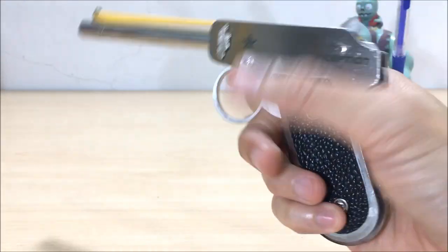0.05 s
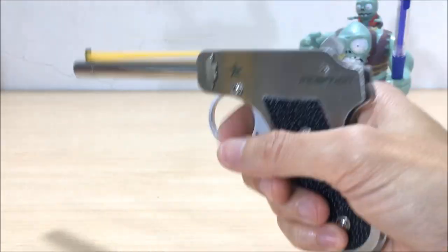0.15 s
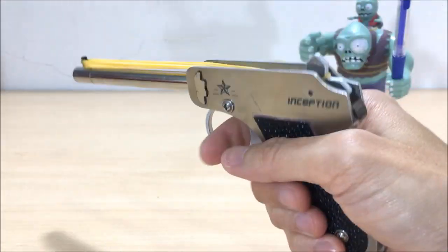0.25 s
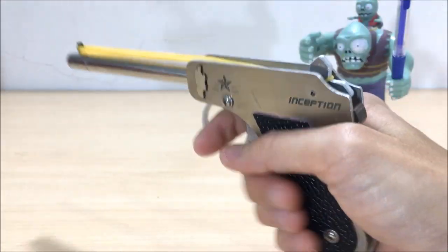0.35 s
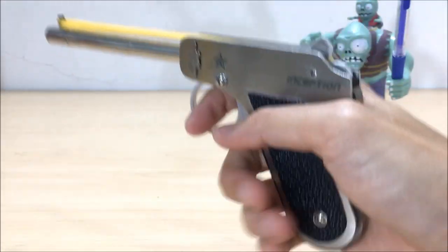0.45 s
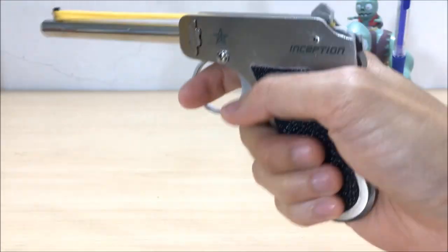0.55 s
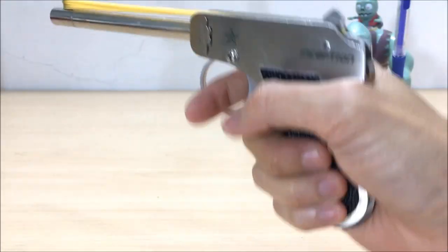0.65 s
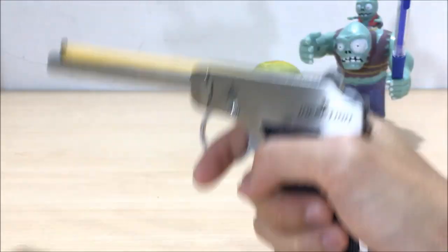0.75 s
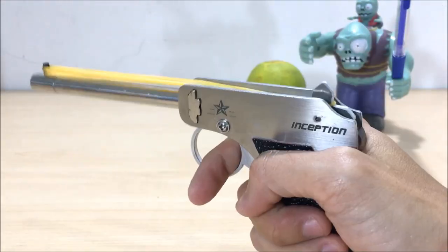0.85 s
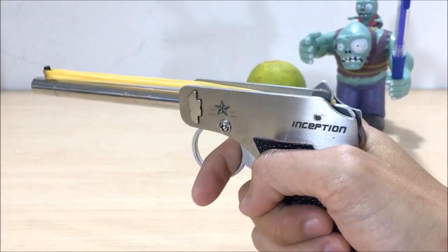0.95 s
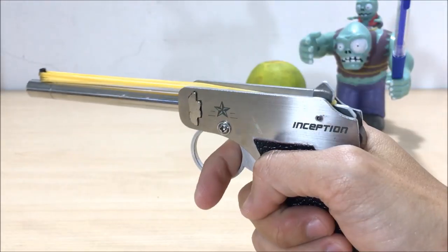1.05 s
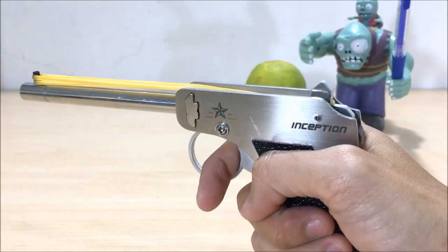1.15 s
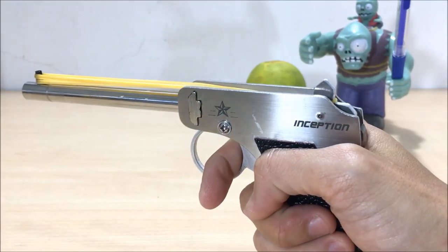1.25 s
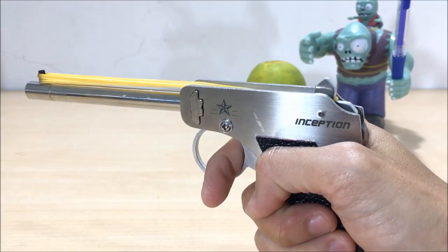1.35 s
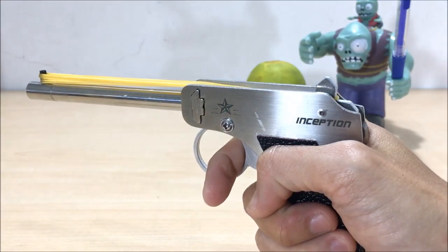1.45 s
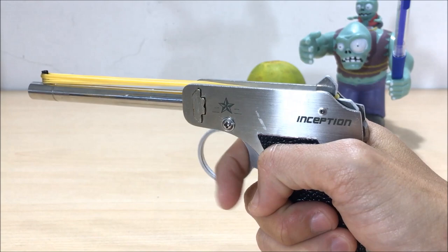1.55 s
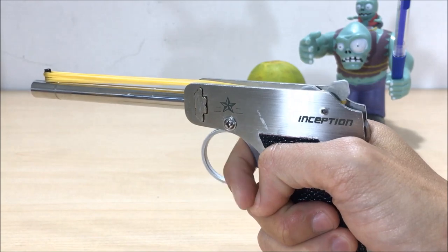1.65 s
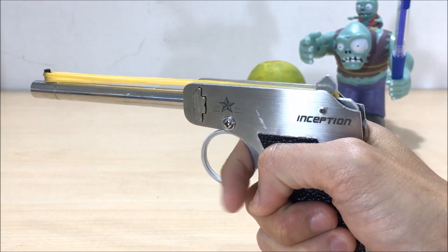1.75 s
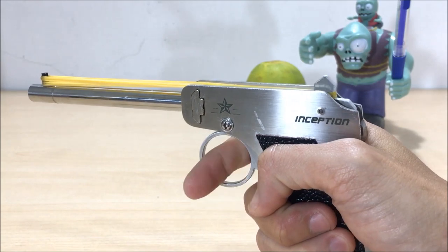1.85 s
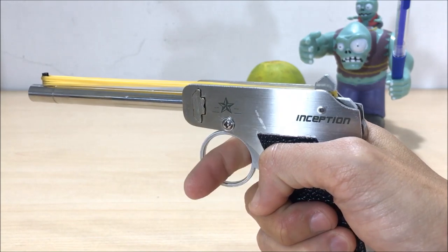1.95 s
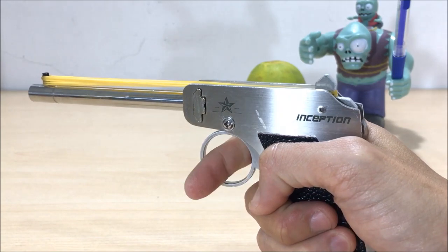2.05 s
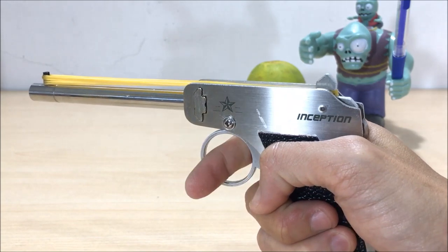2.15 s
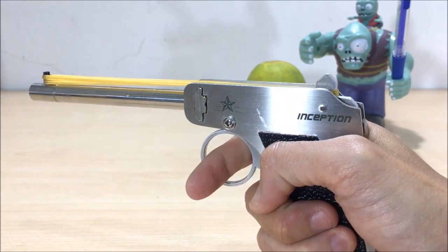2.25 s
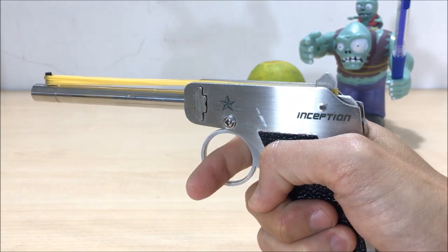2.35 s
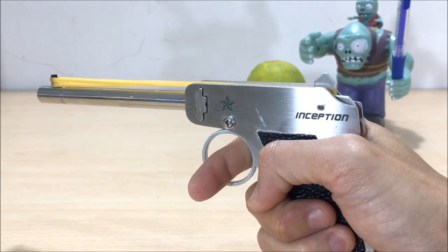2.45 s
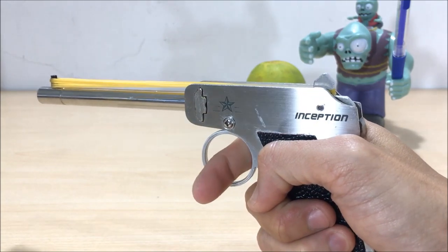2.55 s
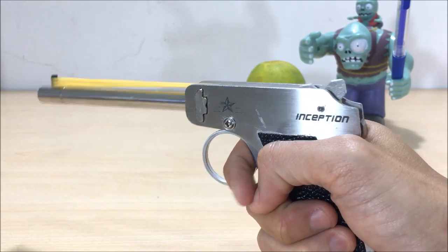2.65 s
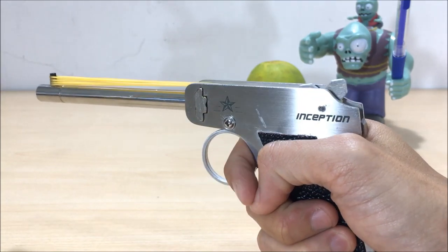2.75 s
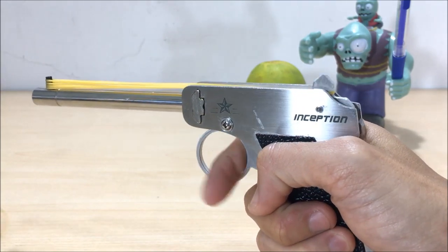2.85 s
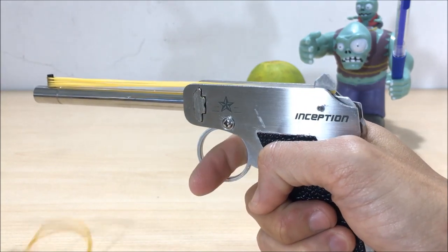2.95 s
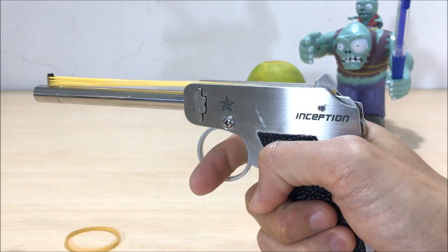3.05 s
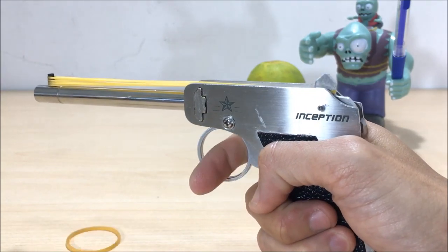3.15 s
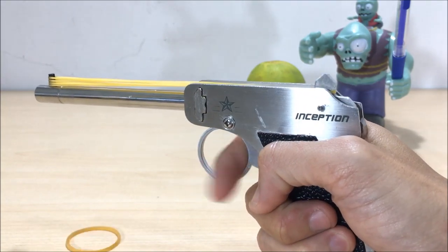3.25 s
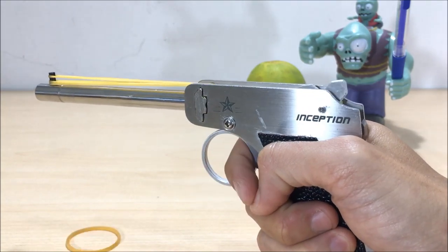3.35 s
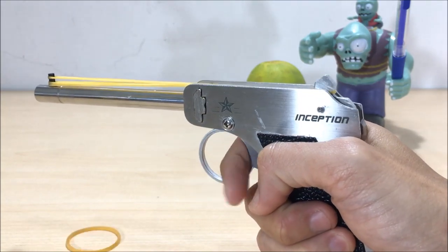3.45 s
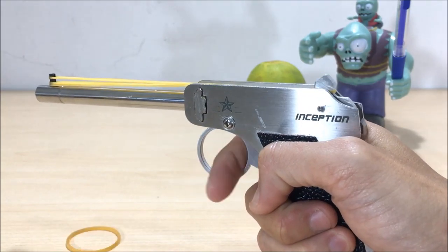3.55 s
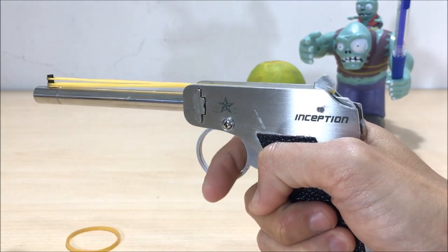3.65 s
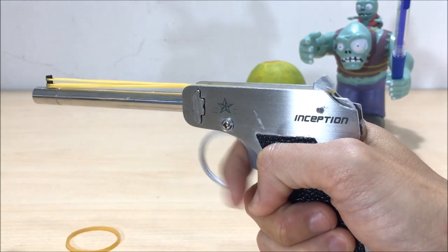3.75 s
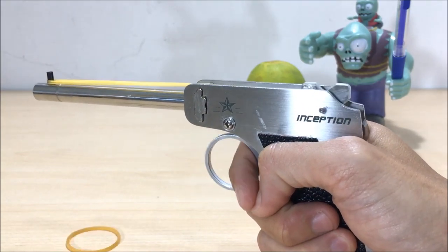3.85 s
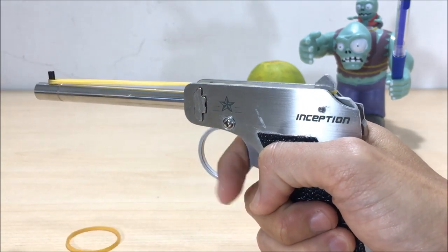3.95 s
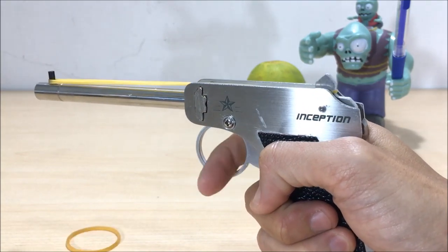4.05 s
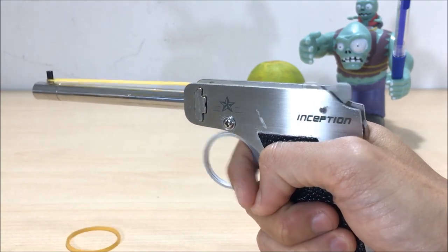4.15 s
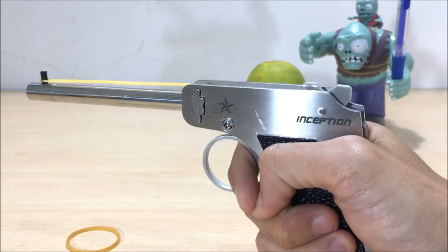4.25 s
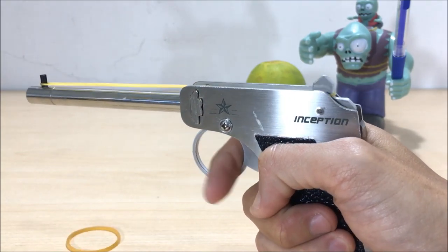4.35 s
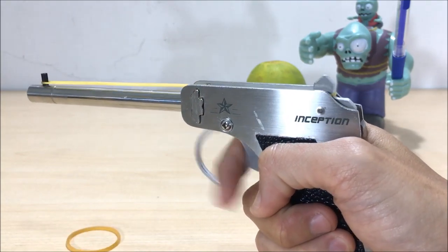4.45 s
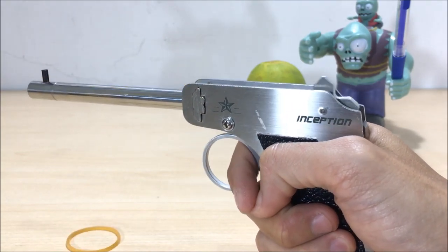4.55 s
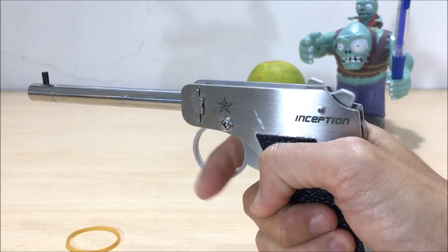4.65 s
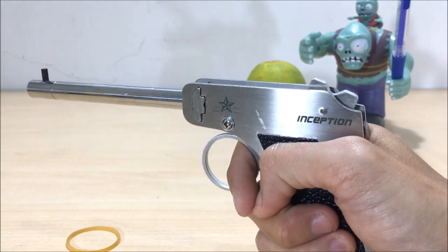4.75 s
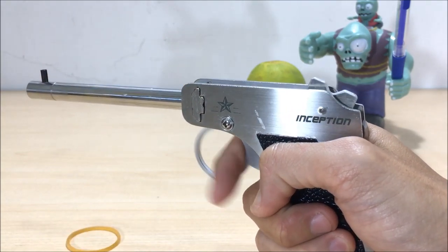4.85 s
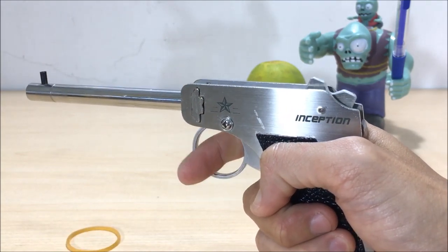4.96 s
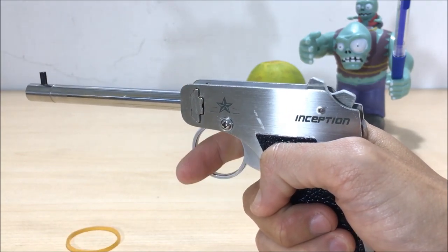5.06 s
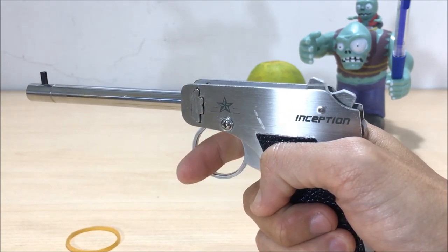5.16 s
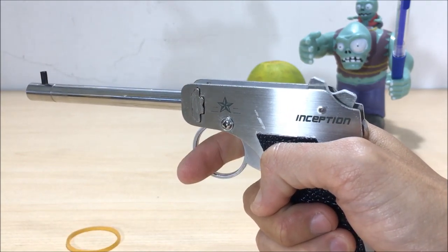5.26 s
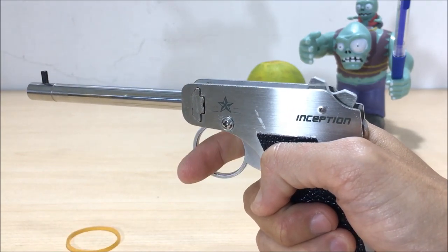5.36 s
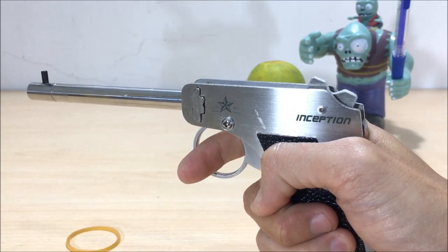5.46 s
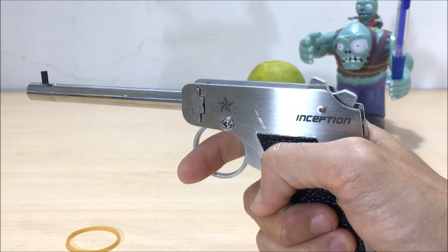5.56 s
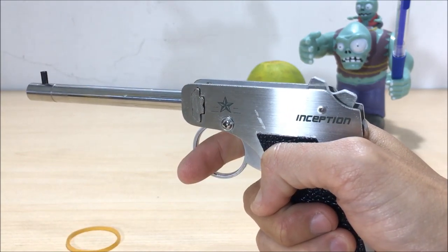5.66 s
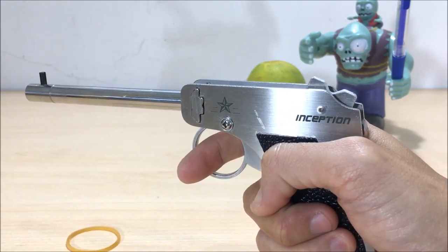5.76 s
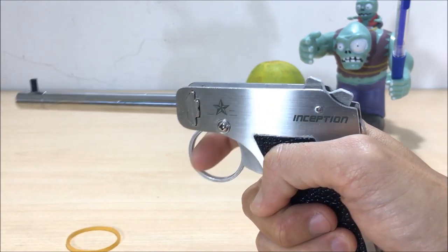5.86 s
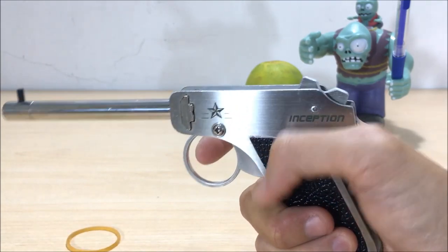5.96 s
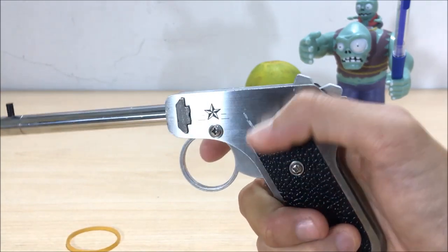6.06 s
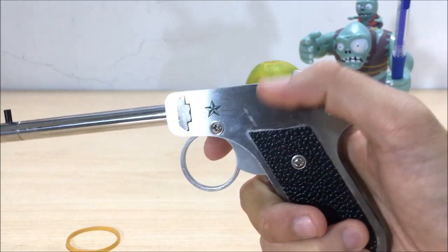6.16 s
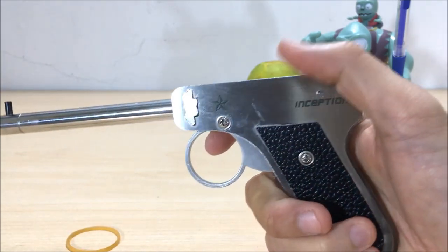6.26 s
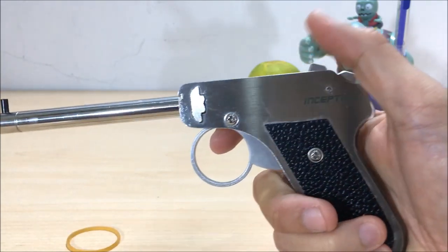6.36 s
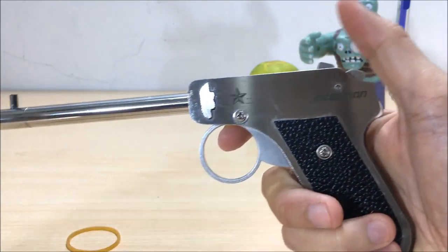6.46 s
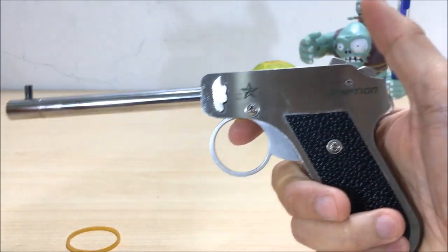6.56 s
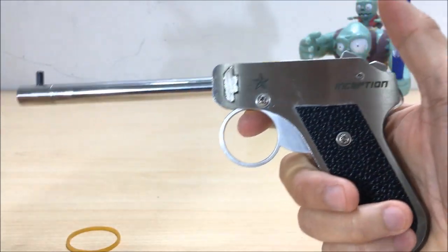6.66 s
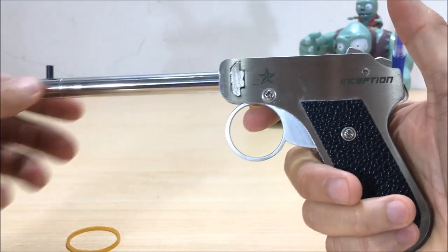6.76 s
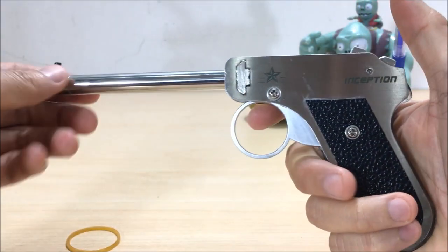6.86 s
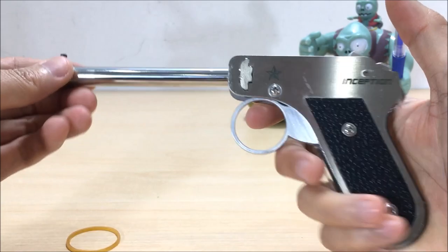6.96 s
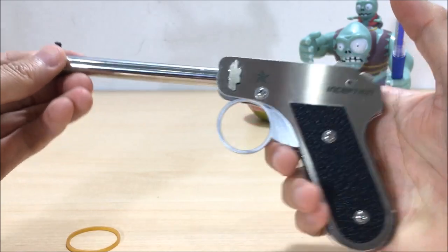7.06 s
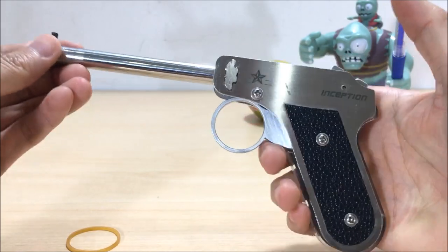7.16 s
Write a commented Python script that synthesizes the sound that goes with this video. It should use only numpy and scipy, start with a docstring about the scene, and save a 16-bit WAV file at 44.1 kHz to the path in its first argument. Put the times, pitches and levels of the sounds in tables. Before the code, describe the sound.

A steel rubber band pistol fires in quick succession, with sharp metal clicks and bands smacking into things.

```python
"""A steel rubber band pistol, close to a microphone over a table in a small room.
Low rumble and a faint twitter run throughout; a hand rubs the frame. A trigger pull trips the release
wheel, the let-go resets the pawl: hard steel clicks that overload the microphone. Five more pulls each
fire a band that smacks into something; the first band rings a hollow thing and shoves air at the mic.
Between shots bands graze, stretch and drop. Last: a light reset, ticks, rubs, a knock on the barrel."""
import sys
import numpy as np
from scipy import signal
from scipy.fft import rfft, irfft
from scipy.io import wavfile

SR = 44100
rng = np.random.default_rng(int(sys.argv[2]) if len(sys.argv) > 2 else 0)


def unload_wav(signal):
    """Save mono or channel-first audio to the path in sys.argv[1] as 16-bit WAV at rate SR, clipped to [-1, 1]."""
    wavfile.write(
        sys.argv[1],
        SR,
        np.round(np.clip(np.atleast_2d(signal).T, -1, 1) * 32767).astype(np.int16),
    )


N = 317520

# room rumble and hiss (frequency [Hz], relative density [dB])
RUMBLE_SPECTRUM = [(10, 2), (27, -2), (40, 0.5), (58, -6.5), (75, -15), (200, -20), (260, -23.5),
                   (380, -22.5), (870, -29.5), (1700, -39), (2700, -44.5), (3300, -43.5), (3800, -45.5),
                   (4600, -43.5), (5300, -49.5), (5800, -47.5), (11000, -63), (16000, -63)]
# steady whines (frequency [Hz], level [dB])
WHINES = [(2040, -80), (3290, -83)]
# twitter notes (pitch [Hz], nominal level [dB])
CHIRPS = [(4100, -78), (4530, -73), (4750, -79), (5850, -83), (6850, -83.5), (8200, -90)]
# soft rubs: hand on frame, band grazing and stretching (time [s], length [s], level [dB], centre [Hz])
RUBS = [(0.242, .13, -70.5, 7960), (0.431, .17, -69, 6370), (0.282, 1, -75, 6000), (0.63, 0.12, -59, 1060),
        (3.151, 0.067, -52, 2960), (3.16, .26, -56.5, 7280), (5.126, 0.077, -60.5, 3260),
        (6.25, .58, -78, 7500), (6.622, 0.18, -64, 1203)]
# wheel jumps one tooth (time [s], force [dB])
PULLS = [(1.671, 6.5), (2.7294, 2.5), (3.3774, 6.5), (3.8565, 5), (4.2353, 5), (4.5646, 1.5)]
# steel-on-steel contact (frequency [Hz], relative gain [dB])
CLACK_SPECTRUM = [(100, -9.5), (1200, -15), (2200, -9), (3500, -5), (5500, -2), (7600, -0.5), (8800, -4),
                  (10000, -4), (11200, -14), (13000, -17), (16000, -21.5)]
# frame and wheel modes (frequency [Hz], relative level [dB], t60 [s])
STEEL_MODES = [(2370, -36, .03), (3530, -22.5, 0.058), (4850, -24.5, .04), (5400, -20, 0.019),
               (5770, -20.5, 0.04), (6230, -18, .03), (7100, -17, 0.023), (7340, -19, 0.026),
               (7730, -18.5, 0.03), (9618, -10.5, 0.016)]
# table and wall reflections (delay [s], gain [dB])
ECHOES = [(.0028, -12.5), (.0066, -23.5), (0.0171, -25.5)]
# room decay (frequency [Hz], t60 [s])
ROOM_T60 = [(150, 0.16), (500, 0.31), (1100, 0.36), (2500, .37), (5300, .39), (9000, 0.36), (14000, 0.21)]
# room tail (frequency [Hz], relative gain [dB])
ROOM_SPECTRUM = [(60, -10), (300, 3), (1500, -4.5), (5000, 0.5), (8000, -3.5), (11000, -2.5), (16000, -1.5)]
# pawl drops back (time [s], force [dB])
RESETS = [(1.8171, 1.5), (2.8882, 2), (3.5289, 0.5), (4.0199, -1), (4.4057, -3)]
# band smacks a thing, or twangs low as it leaves
# (time [s], slap [dB], boom [Hz], boom lift [dB], boom width [Hz])
BAND_SNAPS = [(2.7404, 10.5, 789.5, 14.5, 104.8), (3.4151, -12.5, 327, 10.5, 136),
              (3.8985, -14.5, 1130, 6, 199), (4.2788, -7, 377.6, 2.5, 201.2),
              (4.562, -18.5, 513, 18.5, 167), (4.6174, -19.5, 490, 4.5, 296)]
# rubber slap (frequency [Hz], relative gain [dB])
SLAP_SPECTRUM = [(40, -15.5), (120, -1.5), (330, -1.5), (700, 2), (1000, -3), (1350, 0.5), (1900, -5),
                 (4000, -8.5), (9000, -2), (12000, -7), (16000, -4.5)]
# modes of the hollow thing (frequency [Hz], relative level [dB])
HOLLOW_MODES = [(629.8, -36), (694.4, -30.5), (753.7, -29.5), (769.8, -32.5), (855.9, -29.5),
                (969.0, -40.5), (1071, -40.5), (1136, -40), (1222, -39), (1324, -39.5)]
# spent bands land (time [s], slap [dB], ring lift [dB], bass [dB], room [dB])
DROPS = [(3.249, -23, 9.5, 8, -5), (3.653, -20.5, 17.5, 12, 2.5), (3.727, -25.5, 5.5, 11.5, 3)]
# last pawl reset, small steel ticks, hand knocking the barrel
# (time [s], force [dB], tilt [dB/octave], spot resonance [Hz], spot lift [dB])
LIGHT_CLICKS = [(4.8081, -24, -13.5, 5620, 8.5), (4.9578, -34, -5, 2066, 18), (5.925, -57, -3.5, 7600, 9),
                (6.1463, -58, 0, 8106, 1), (7.0123, -53, 2, 6450, 9), (7.0549, -19.5, 3, 1450, 20.5)]


def gain_of(db):
    """Decibels to amplitude."""
    return 10 ** (np.asarray(db) / 20)


def unit_rms(x):
    """Scales to rms 1."""
    return x / np.sqrt(np.mean(x ** 2) + 1e-20)


def lookup(table, hz):
    """Interpolates on a log-frequency axis."""
    table_hz, values = np.transpose(table)
    return np.interp(np.log(hz + 1), np.log(table_hz), values)


def add(mix, time_s, sound):
    """Mixes a sound in at time_s."""
    part = mix[max(round(time_s * SR), 0):][:len(sound)]
    part += sound[:len(part)]


def colour(x, shape_db, size=4096):
    """Minimum-phase filter of unit energy, shaped by shape_db(hz)."""
    log_gain = np.log(gain_of(shape_db(abs(np.fft.fftfreq(size, 1 / SR)))) + 1e-5)
    taps = np.fft.ifft(np.exp(np.conj(signal.hilbert(log_gain)))).real[:size // 2]
    return signal.fftconvolve(x, taps / np.linalg.norm(taps))[:len(x)]


def decay(t, t60_s):
    """Falls 60 dB in t60_s."""
    return np.exp(-np.log(1000) * t / t60_s)


def resonance_db(hz, centre_hz, lift_db, width_hz):
    """One peak on a flat response."""
    offset = (hz ** 2 - centre_hz ** 2) / (width_hz * hz + 1)
    return 10 * np.log10(1 + (gain_of(lift_db) ** 2 - 1) / (1 + offset ** 2 / 2) ** 2)


def room_tone(rumble_db=-43):
    """Steady rumble, faint hiss, thin whines."""
    t = np.arange(N) / SR
    spectrum = gain_of(lookup(RUMBLE_SPECTRUM, np.fft.rfftfreq(N, 1 / SR)))
    rumble = unit_rms(irfft(rfft(rng.standard_normal(N)) * spectrum, N))
    whines = sum(gain_of(db) * np.sin(2 * np.pi * hz * t) for hz, db in WHINES)
    return gain_of(rumble_db) * rumble + whines


def twitter(pitch_hz, level_db, count=32, blur_hz=110, spread=.033):
    """A thin, fuzzy note recurs, random in time, level and pitch."""
    out = np.zeros(N)
    swell = signal.windows.hann(SR // 8)
    t = np.arange(len(swell)) / SR
    for slot, (late, size, detune) in enumerate(rng.random((count, 3))):
        blur = rng.standard_normal(len(t) // 32)
        wobble = np.interp(t * 2 * blur_hz, np.arange(len(blur)), blur)
        note_hz = pitch_hz * (1 + spread * (2 * detune - 1))
        note = 2 * wobble * np.sin(2 * np.pi * note_hz * t)
        add(out, (slot + late) * N / SR / count, gain_of(level_db) * (.5 + size) * swell * note)
    return 0, out


def rub(time_s, length_s, level_db, centre_hz, grain_db=4, rolloff_db=14):
    """Soft, grainy friction: a hand on the frame, or a band grazing and stretching."""
    count = int(length_s * SR)
    grains = rng.standard_normal(count) * gain_of(grain_db * rng.standard_normal(count))
    hiss = colour(grains, lambda hz: -rolloff_db * np.log2((hz + 1) / centre_hz) ** 2)
    return time_s, gain_of(level_db) * unit_rms(hiss) * signal.windows.hann(count)


def chatter(t, t60_s, evenness, first_hit=2.9):
    """One contact, then a dying burst of smaller ones; evenness (0-1) flattens spectral ripple."""
    contacts = np.where(t == 0, first_hit, np.sign(rng.standard_normal(len(t))) * decay(t, t60_s))
    power = abs(rfft(contacts)) ** 2
    ripple_db = 10 * np.log10(power / power.mean() + .03)
    bins_hz = np.fft.rfftfreq(len(t), 1 / SR)
    flattened = colour(contacts, lambda hz: -evenness * np.interp(hz, bins_hz, ripple_db))
    return flattened * np.linalg.norm(contacts) / np.linalg.norm(flattened)


def room_tail(x, room_db, build_s=.008):
    """Diffuse sound builds up, then dies band by band."""
    hz, t, bands = signal.stft(rng.standard_normal(SR * 2 // 3), SR, nperseg=256)
    bands *= decay(t, lookup(ROOM_T60, hz)[:, None]) * gain_of(lookup(ROOM_SPECTRUM, hz))[:, None]
    tail = signal.istft(bands, SR, nperseg=256)[1]
    tail *= 1 - np.exp(-(np.arange(len(tail)) / SR / build_s) ** 2)
    return gain_of(room_db) * signal.fftconvolve(x, tail / np.linalg.norm(tail))


def click(time_s, force_db, t60_s, edge_hz, tilt_db_oct, scrape_db, spot_hz, spot_db,
          room_db=-13, scrape_s=.0058, shelf_db=-8, detune=.011):
    """A short scrape, then a chattering blow rings the steel frame."""
    def accent_db(hz):
        octaves = np.log2(np.maximum(hz, edge_hz) / edge_hz)
        return tilt_db_oct * octaves + shelf_db / (1 + (hz / edge_hz) ** 10)

    def shape_db(hz):
        # lighter blow: longer contact, less top
        dull_db = np.clip(.45 * force_db, -9, 0) / (1 + (11500 / (hz + 1)) ** 12)
        peak_db = resonance_db(hz, spot_hz, spot_db, width_hz=.14 * spot_hz)
        return lookup(CLACK_SPECTRUM, hz) + accent_db(hz) + dull_db + peak_db

    t = np.arange(SR // 10) / SR
    blow = colour(chatter(t, t60_s, evenness=.1), shape_db)
    for hz, db, ring_t60_s in STEEL_MODES:
        drift, phase = rng.uniform(-1, 1, 2)
        mode = np.sin(2 * np.pi * hz * (1 + detune * drift) * t + np.pi * phase)
        blow += gain_of(db + accent_db(hz)) * decay(t, ring_t60_s) * mode
    scrape = colour(rng.standard_normal(len(t)) * (t < scrape_s) * t / scrape_s, shape_db)
    out = np.zeros(SR)
    add(out, 0, gain_of(scrape_db) * scrape)
    add(out, scrape_s, blow)
    for delay_s, db in ECHOES:
        add(out, scrape_s + delay_s, gain_of(db) * blow)
    # the room sums all directions, partly averaging out the blow's ripple
    smooth_blow = np.linalg.norm(blow) * colour(1. * (t == 0), shape_db)
    add(out, scrape_s, room_tail(.68 * smooth_blow + .65 * blow, room_db))
    return time_s - scrape_s, gain_of(force_db) * out


def pawl_t60_s(force_db, base_s=.02, halving_db=8.5):
    """A harder blow seats the pawl sooner."""
    return base_s * 2 ** (-force_db / halving_db)


def pull(time_s, force_db):
    """The wheel scrapes off the pawl and slams into the next stop: a full, bright clack."""
    return click(time_s, force_db, pawl_t60_s(force_db), edge_hz=3300, tilt_db_oct=.45,
                 scrape_db=-18.5 - force_db, spot_hz=3330, spot_db=3.5)


def reset(time_s, force_db):
    """The pawl springs back with little scrape: a narrower clack."""
    return click(time_s, force_db, pawl_t60_s(force_db), edge_hz=3500, tilt_db_oct=0,
                 scrape_db=-24 - force_db, spot_hz=5296, spot_db=3)


def smack(time_s, slap_db, boom_hz, boom_db, width_hz, bass_db, room_db, top_hz, t60_s, first_hit,
          bass_hz=350):
    """A rubber slap with one damped boom."""
    def rubber_db(hz):
        return lookup(SLAP_SPECTRUM, hz) - 10 * np.log10(1 + (hz / top_hz) ** 5)

    def body_db(hz):
        return resonance_db(hz, boom_hz, boom_db, width_hz) + bass_db / (1 + (hz / bass_hz) ** 4)

    t = np.arange(SR // 4) / SR
    contacts = chatter(t, t60_s, evenness=.62, first_hit=first_hit)
    hit = colour(colour(contacts, rubber_db), body_db)
    out = room_tail(hit, room_db)
    add(out, 0, hit)
    return time_s, gain_of(slap_db) * out


def band_snap(time_s, slap_db, boom_hz, boom_db, width_hz):
    """A band smacks a thing, or twangs low as it leaves; louder is nearer, thinner and longer."""
    return smack(time_s, slap_db, boom_hz, boom_db, width_hz, bass_db=-2 - .4 * slap_db,
                 room_db=-4.5 - .2 * slap_db, top_hz=4900, t60_s=.021 * 2 ** (slap_db / 19.5),
                 first_hit=4.4)


def hollow_ring(time_s=2.7404, level_db=-23.5, rise_s=.012, t60_s=.27):
    """The first band rings a hollow thing's cluster of close modes."""
    t = np.arange(SR // 2) / SR
    modes = sum(gain_of(db) * np.sin(2 * np.pi * hz * t + rng.uniform(0, 2 * np.pi))
                for hz, db in HOLLOW_MODES)
    envelope = (1 - np.exp(-t / rise_s)) * decay(t, t60_s)
    return time_s, gain_of(level_db) * unit_rms(modes * envelope)


def draught(time_s=2.747, push_db=-9, push_s=.003, suck_db=-22, suck_s=.075):
    """The first band's wake shoves air at the microphone; pressure swings slowly back."""
    t = np.arange(SR // 2) / SR
    push, suck = ((t / peak_s) ** 2 * np.exp(2 - 2 * t / peak_s) for peak_s in (push_s, suck_s))
    return time_s, gain_of(push_db) * push - gain_of(suck_db) * suck


def drop(time_s, slap_db, ring_db, bass_db, room_db):
    """A slack band flops down: a long, dull tap with a soft start."""
    return smack(time_s, slap_db, boom_hz=860, boom_db=ring_db, width_hz=65, bass_db=bass_db,
                 room_db=room_db, top_hz=2953, t60_s=.049, first_hit=1.5)


def light_click(time_s, force_db, tilt_db_oct, spot_hz, spot_db):
    """Last pawl reset, small steel tick or hand knocking the barrel, coloured by the spot hit."""
    return click(time_s, force_db, t60_s=.017, edge_hz=4230, tilt_db_oct=tilt_db_oct,
                 scrape_db=-35.5, spot_hz=spot_hz, spot_db=spot_db, room_db=-15)


def scene():
    """All events over the room tone, mono."""
    mix = room_tone()
    for source, table in ((pull, PULLS), (reset, RESETS), (light_click, LIGHT_CLICKS),
                          (band_snap, BAND_SNAPS), (drop, DROPS), (rub, RUBS), (twitter, CHIRPS)):
        for row in table:
            add(mix, *source(*row))
    add(mix, *hollow_ring())
    add(mix, *draught())
    return mix[None]


def record(dry, ceiling=.96, cutoff_hz=15950):
    """Input overload with a firm knee, then a low-pass."""
    oversampled = signal.resample_poly(dry, 2, 1, axis=1)
    clipped = ceiling * oversampled / (1 + oversampled ** 6) ** (1 / 6)
    limited = signal.resample_poly(clipped, 1, 2, axis=1)
    lowpass = signal.firwin(255, cutoff_hz, window=("kaiser", 8), fs=SR)
    return signal.oaconvolve(limited, lowpass[None], "same")


dry = scene()
out = record(dry)
unload_wav(out)
```